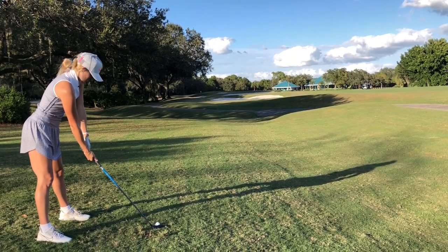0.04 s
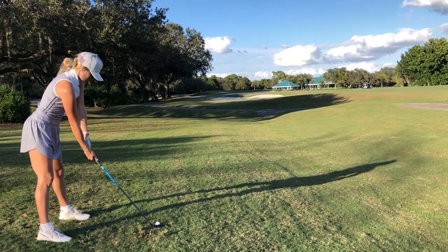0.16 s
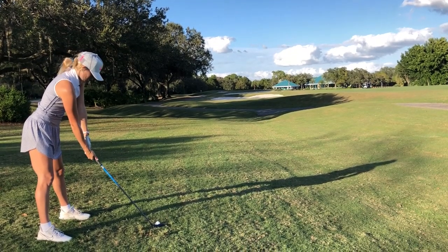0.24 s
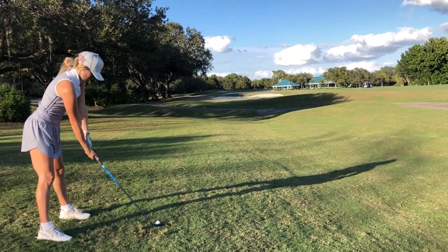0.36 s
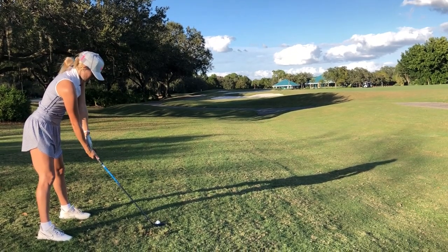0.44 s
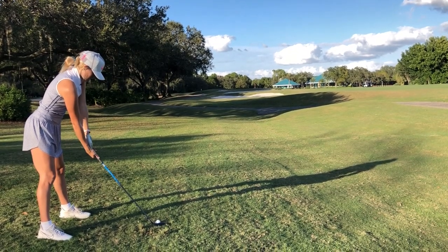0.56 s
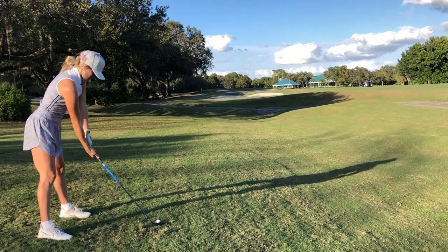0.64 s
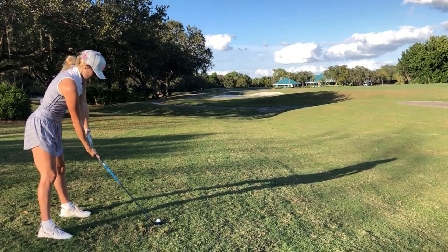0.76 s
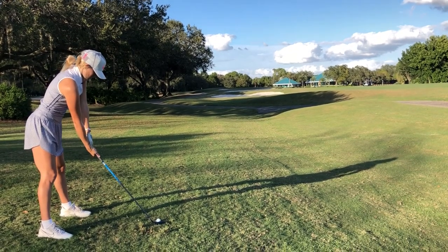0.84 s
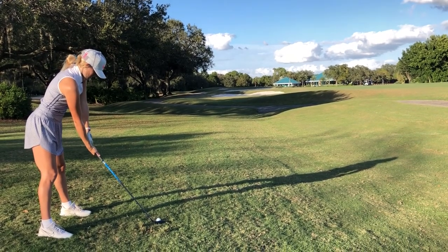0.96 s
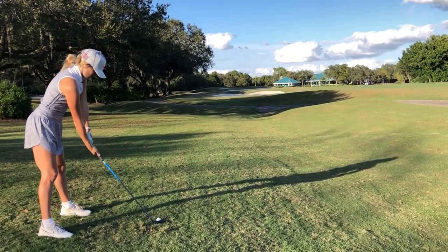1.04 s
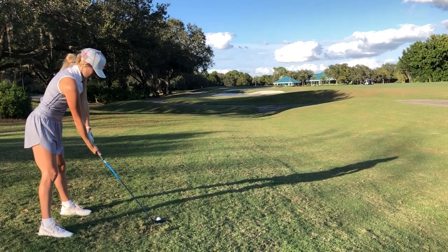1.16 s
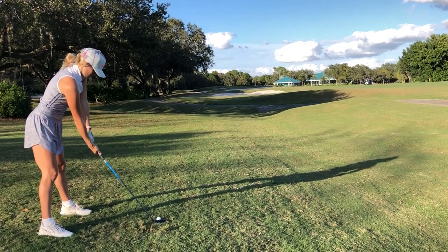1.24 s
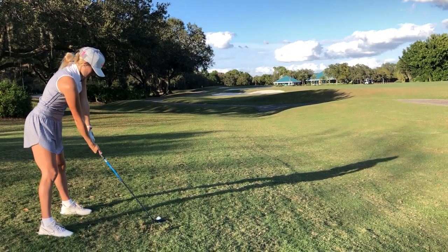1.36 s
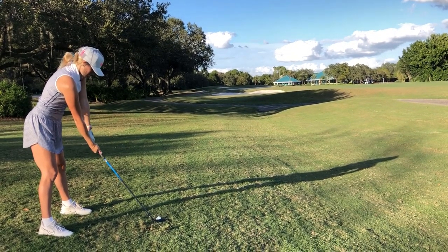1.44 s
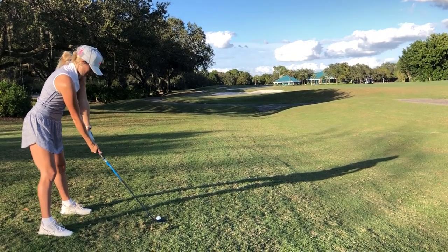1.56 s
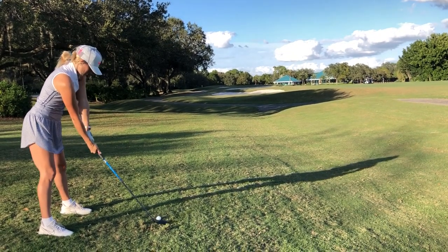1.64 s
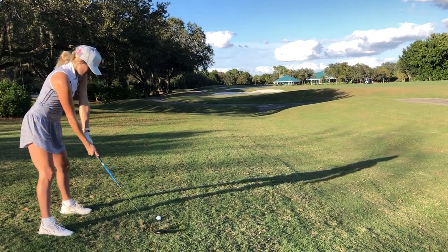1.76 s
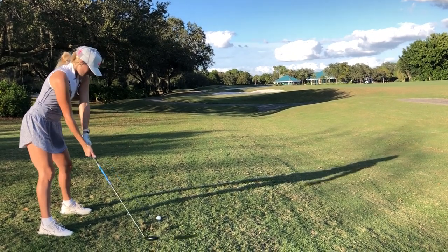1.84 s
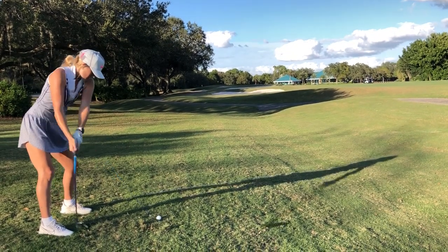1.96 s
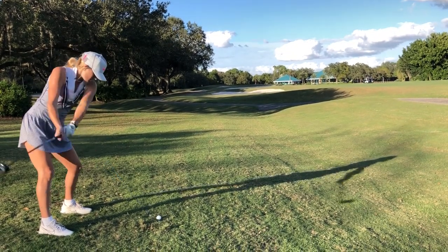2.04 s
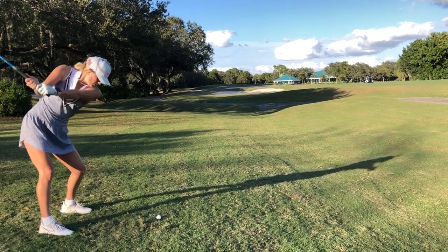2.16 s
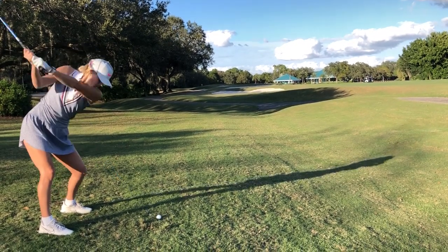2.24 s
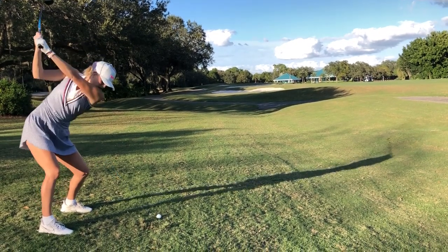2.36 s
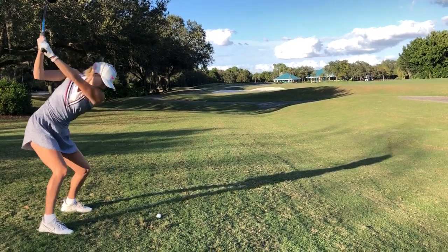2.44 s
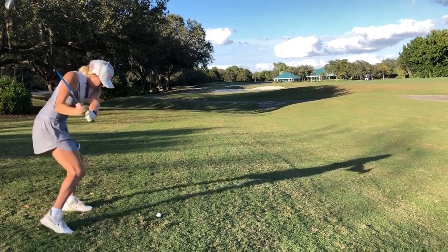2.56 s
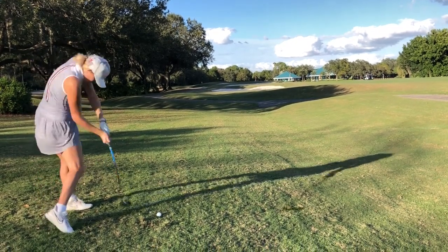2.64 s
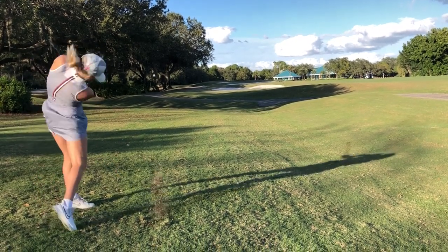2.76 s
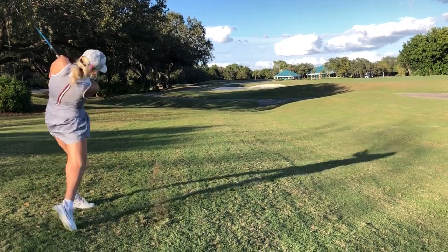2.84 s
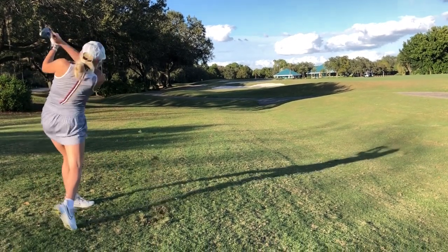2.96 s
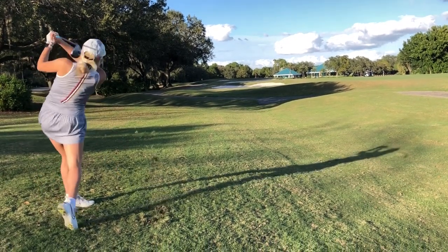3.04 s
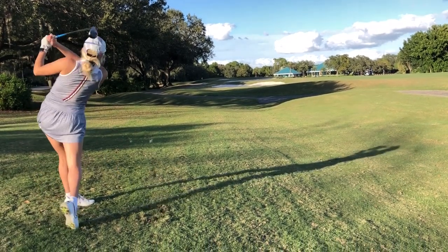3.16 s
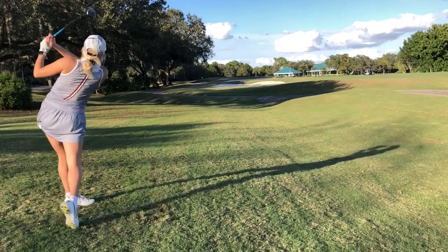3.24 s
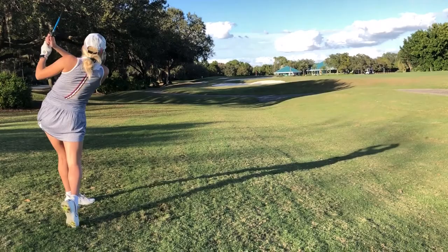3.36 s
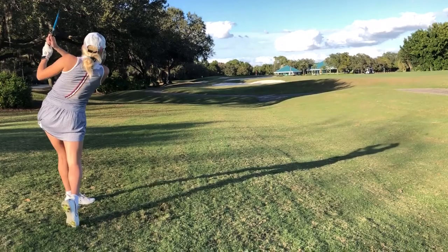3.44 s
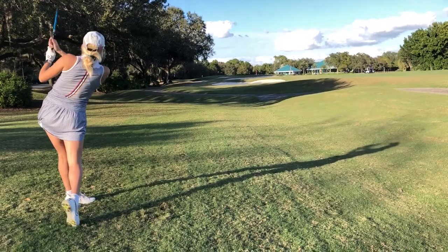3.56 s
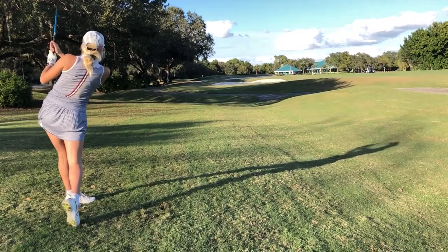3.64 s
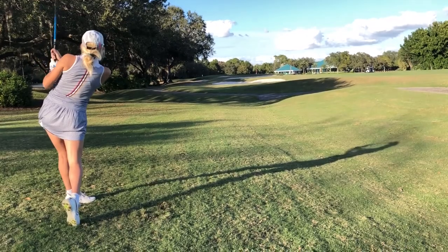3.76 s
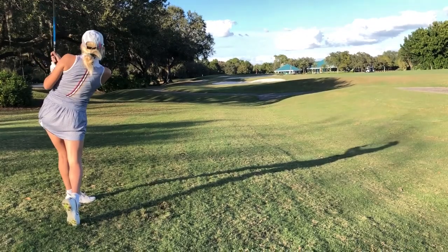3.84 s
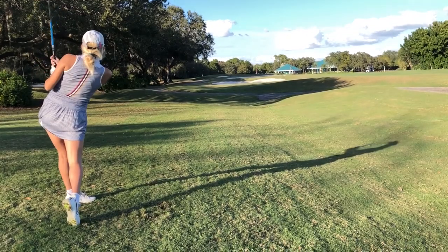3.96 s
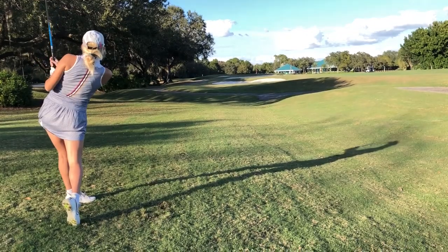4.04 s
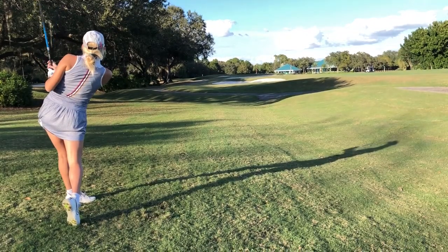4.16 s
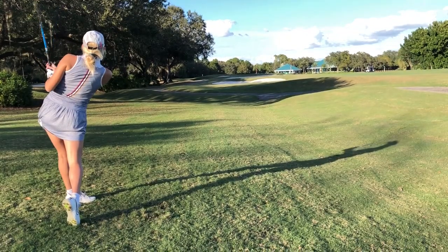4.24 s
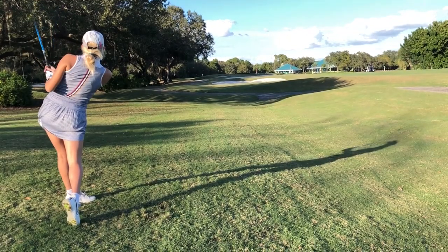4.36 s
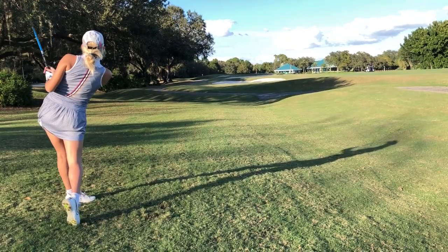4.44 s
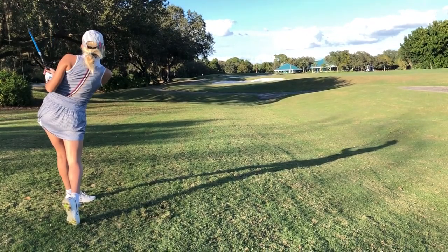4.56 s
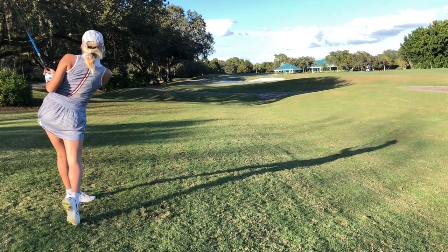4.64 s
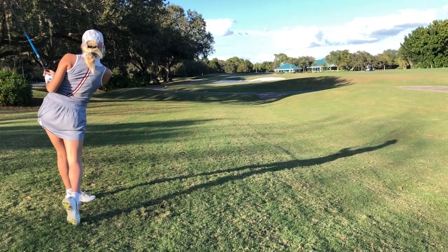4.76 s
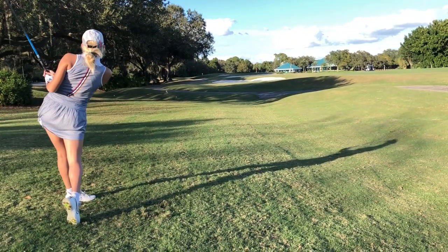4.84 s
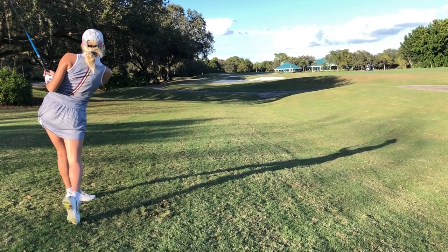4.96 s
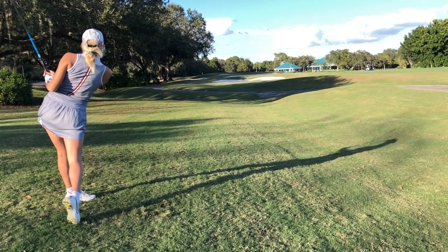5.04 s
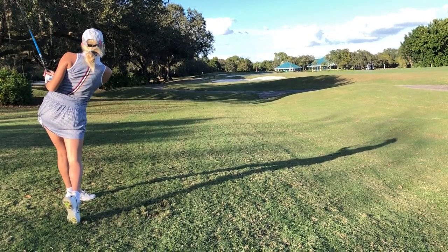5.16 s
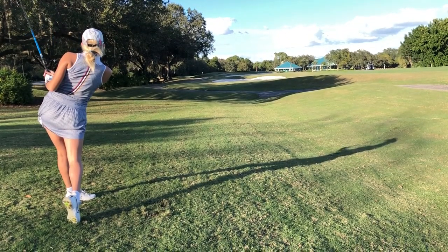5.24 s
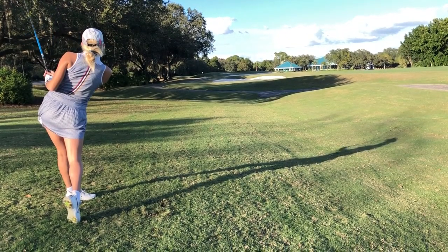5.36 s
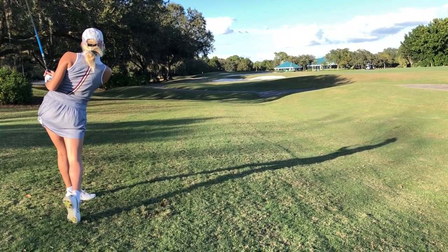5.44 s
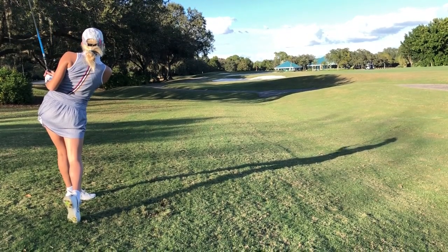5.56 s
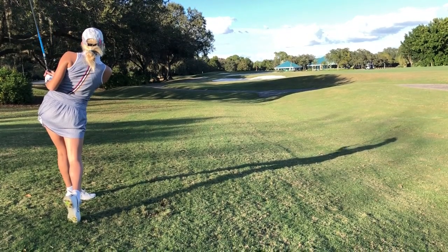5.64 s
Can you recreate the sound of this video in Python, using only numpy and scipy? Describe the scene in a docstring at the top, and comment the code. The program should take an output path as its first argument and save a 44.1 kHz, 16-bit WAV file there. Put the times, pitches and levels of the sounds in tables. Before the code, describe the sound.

A faint, steady outdoor background runs throughout: distant traffic rumble, a soft wash of air and tiny high peeps from far birds. One nearer bird chips at about 0.9 seconds. Around 1.6 seconds a golf club barely brushes the grass, and at 2.4 a thin, falling bird call sounds. The iron swishes down at 2.6 and, at 2.7, rips the turf and strikes the ball with a sharp, bright click and a dull thud. This is the loudest moment, briefly overloading the microphone, and the tree line echoes it. Just after 3.1 seconds comes a quick cluster of sharp woody cracks, as of the ball hitting branches, scattering through the trees. Small bits tick down, fading until about 4.1. Soft leafy rustles with light knocks follow around 4.5 to 4.7, then only the birds and rumble remain until about 5.6 seconds.

```python
"""A golf iron swishes down, cuts the turf and strikes the ball; the tree line throws the click back.
Moments later come sharp woody cracks, as of the ball hitting branches, then soft falls through leaves.
Small birds call over a distant rumble and still air; the loudest blow overloads the microphone."""
import sys
import numpy as np
from scipy import signal
from scipy.fft import rfft, irfft, next_fast_len
from scipy.io import wavfile
from scipy.ndimage import map_coordinates

SR = 44100
rng = np.random.default_rng(int(sys.argv[2]) if len(sys.argv) > 2 else 0)


def int16_out(signal):
    """Quantize to a 16-bit WAV file."""
    q = np.round(np.clip(np.atleast_2d(signal).T, -1, 1) * 32767)
    wavfile.write(sys.argv[1], SR, q.astype(np.int16))


N = 251805

# the iron's head and the ball ring together: (Hz, dB, t60 s)
IRON = [(1060, -20, .03), (1545, -21, .025), (4150, -19, .03), (4605, -14, .042), (5870, 10, .0065), (6330, -14, .035),
        (7130, -13, .025), (8050, -14, .03), (10100, -7, .014), (13400, -17, .018), (15260, -19, .02),
        (8350, -16.5, .065)]  # fixed
STRIKE_S = 2.7203
# the sole tears through grass and soil: (s, blades dB, soil dB, rise s, t60 s)
DIVOT = [(2.696, -34, -61, 0.00034, 0.025), (2.7103, -29, -28.5, .0005, 0.017), (2.7134, -8, -19.5, 0.00082, .03),
         (2.716, -12.5, -12, .001, 0.026), (2.7318, -20, -25.5, .001, 0.062)]
BLADES = [(1500, -10), (2900, -16.5), (4200, -10), (5000, -8), (6000, -0.5), (6900, -6.5), (8300, 1), (9100, -9), (11500, -8), (12600, -7.5), (14000, -12), (16000, -11.5)]  # (Hz, dB per Hz)
SOIL = [(60, -9.5), (200, -3), (290, 0), (420, -1), (640, -0.5), (850, -16.5), (1100, -6), (1600, -9.5), (2500, -18), (5000, -49)]  # (Hz, dB per Hz)
# a struck branch: (Hz, dB, t60 s)
WOOD = [(1408, -23, .035), (2219, -16.5, 0.013), (2750, -12, 0.017), (3373, -2.5, 0.019), (4020, -14.5, 0.04), (4300, -8.5, .014), (4960, -8.5, 0.013), (7640, -18.5, .018), (8374, -20, 0.027), (11730, -23.5, 0.0199)]
# blows on twigs and branches, thinner ones ringing higher: (s, ring dB, pitch ratio, snap dB, snap t60 s)
KNOCKS = [(3.1054, -46, 1.3, -21, .009), (3.1328, -18, 1.0, -30, 0.12), (3.1465, -3.5, 1.0, -18, .024), (3.19, -35, 1.15, -31, .015), (3.2127, -22.5, 1.02, -31, 0.027),
          (3.928, -46, 1.1, -54, .03), (4.5168, -30, 1.1, -46.5, .02), (4.571, -44, 1.12, -59, .02), (4.6452, -39, 1.55, -49, .02)]
SNAP = [(300, -3.5), (1200, 0), (2500, -2), (5000, -3), (8000, -3), (9500, -6.5), (12000, 0), (16000, -6)]  # (Hz, dB per Hz)
# brief stirs of leaves and grass: (s, dB, rise s, t60 s, brightness dB per octave)
RUSTLES = [(1.906, -53.5, .002, .05, 4.5), (2.396, -53, 0.0022, 0.04, 4), (3.942, -51.5, 0.0014, .06, 4), (4.501, -38, .001, 0.24, -1),
           (4.644, -46, 0.0011, 0.15, 1.5), (5.04, -55, .004, 0.079, 8)]
LEAVES = [(400, -14), (750, -5), (1200, -13), (1620, -4.5), (2100, -11.5), (2900, -9.5), (3750, 0), (4500, -5.5), (6200, -11), (10000, -20), (12300, -23), (15800, -39.5)]  # (Hz, dB per Hz)
# the club's click as the near edge of the trees sends it back: (Hz, dB per Hz)
CLICK_NEAR = [(710, -46), (1200, -8), (1400, -6), (1710, -14), (1890, -13), (2030, -18), (2970, -3), (3340, -15.5),
              (3970, -11.5), (5030, -1.5), (5660, -11), (6520, 2), (8810, -18), (10900, -11), (15800, -24)]
# the click from deep inside the trees: (Hz, dB per Hz)
CLICK_FAR = [(1500, -10), (2700, -7.5), (3500, -10), (4400, -7.5), (5050, 1), (5650, -7.5), (6350, 0.5), (7200, -13.5), (9000, -20), (16000, -24)]
# a branch's crack as its own crown scatters it: (Hz, dB per Hz)
CRACK_NEAR = [(350, -30.5), (600, -5.5), (800, -13.5), (955, -6.5), (1110, -15.5), (1400, -4), (1540, -17), (2320, -15.5),
              (3960, -4), (4670, -7.5), (6220, -8), (6750, -11), (15800, -17.5)]
# the crack from deep inside the grove: (Hz, dB per Hz)
CRACK_FAR = [(1500, -18), (3000, -12), (3600, -3), (4050, 0.5), (4700, -9.5), (6000, -14.5), (8500, -22.5), (12000, -19), (16000, -32)]
# the clearest paired peeps of small far birds: (s, Hz, dB)
PEEPS = [(.215, 6000, -67), (.575, 5970, -70), (2.06, 5560, -68), (3.9, 5620, -69), (4.35, 5640, -67.5), (4.835, 5900, -67), (5.22, 5950, -68), (5.352, 5620, -67.5), (5.597, 5970, -66.5)]
AIR = [(150, -32.5), (250, -4.5), (360, -1), (450, -3), (720, -2), (950, -2), (1250, -7), (1650, -15), (2250, -19.5), (4400, -26.5), (5700, -26.5), (7600, -31), (10000, -33), (15800, -34.5)]  # (Hz, dB per Hz)
RUMBLE = [(12, -52.5), (20, -30.5), (59, -1.5), (123, 1.5), (150, 0.5), (300, -17), (390, -47), (660, -120)]  # (Hz, dB per Hz)
# echo delay of the second row of trees (s)
BEHIND_S = .115  # fixed
TOP_HZ = 15900  # fixed
T = np.arange(N) / SR
# a thin steady whine, perhaps of insects in the grass: (Hz, unsteadiness, dB)
SHRILL = [(8950, .008, -80), (9990, .001, -79)]
# the ground under the divot: (Hz, dB, t60 s)
GROUND = [(52.04, -7.5, 0.14), (130, -8, 0.055), (185, 0.5, 0.065), (277, -6, 0.025)]
# the club skims the grass on the way back: start, attack, hold, release (s) and level (dB)
SKIM_S, SKIM_ATTACK_S, SKIM_HOLD_S, SKIM_RELEASE_S, SKIM_DB = 1.54, 0.14, .1, .07, -59.5
# the downswing: clothes start to swish, then the wrists let go and whip the club up to speed (s)
DOWNSWING_S, WHIP_S, WHIP_RISE_S = 2.41, 2.628, .016
# the blow takes a share of the club's speed within BRAKE_S; the rest fades over COAST_S
SPEED_LOSS, BRAKE_S, COAST_S = .36, .012, .27
# air noise at full speed, and the swish of clothes (dB)
SHAFT_DB, HEAD_DB, HISS_DB, CLOTHES_DB = -32.5, -39, -40, -60.5
# the hiss swells as the head nears the ball and fades as it leaves
HISS_RISE_DB_PER_S, HISS_FALL_DB_PER_S = 250, 330
# a fainter bird peeps at random, about once in each interval
FAINT_PEEP_EVERY_S, FAINT_PEEP_HZ, FAINT_PEEP_DB = .45, 5450, -70.5
# a nearer bird's chip, one quick arch of pitch: time and half width (s), top pitch (Hz), level (dB)
CHIP_S, CHIP_WIDTH_S, CHIP_HZ, CHIP_DB = .8635, 0.0048, 5480, -45
# a thin falling call: start, attack, hold and release (s); its pitch settles over CALL_SETTLE_S
CALL_S, CALL_ATTACK_S, CALL_HOLD_S, CALL_RELEASE_S, CALL_SETTLE_S = 2.42, .025, .19, .06, 0.046
# the call's two voices: (final Hz, share sharp at the start, fade dB per s, dB of harmonics 1 to 4)
CALL_VOICES = [(2765, .16, 5, -66, -60, -80, -75), (2240, .04, 55, -80.5, -63, -64.5, -78)]
# distant traffic and the wash of air: level and slow drift (dB)
RUMBLE_DB, RUMBLE_DRIFT_DB, AIR_DB, AIR_DRIFT_DB = -44.5, 0.8, -51, 0.52
# the dull thwack of the head driving into the turf: (Hz, dB, t60 s)
THWACK = [(320, -17, .03), (668, -14, .018), (1230, -14, .02), (1690, -20, .018)]
THWACK_S = 2.7178
# bits of twig and leaf tick down after the cracks: start (s), rate (per s), first level (dB), fade (dB per s)
DEBRIS_S, DEBRIS_PER_S, DEBRIS_DB, DEBRIS_FADE_DB_PER_S = 3.22, 22, -47.5, 14


def amp(db):
    """Decibels to gain."""
    return 10 ** (np.asarray(db) / 20)


def unit(x):
    """Scale to rms 1."""
    return x / np.sqrt(np.mean(x ** 2) + 1e-20)


def noise(spectrum, tilt_db=0, size=2 * SR):
    """Noise of rms 1 shaped by (Hz, dB) points and a tilt per octave; size samples, repeated, serve a short sound."""
    octave = np.log2(np.fft.rfftfreq(size, 1 / SR) + 1)
    hz, db = np.transpose(spectrum)
    gain = amp(np.interp(octave, np.log2(hz), db, left=-120) + tilt_db * octave)
    return np.resize(unit(irfft(rfft(rng.standard_normal(size)) * gain, size)), N)


def swell(start, attack, hold, release):
    """An envelope that rises smoothly at start, holds and falls to silence."""
    ramp = np.minimum((T - start) / attack, 1 - (T - start - attack - hold) / release)
    return np.sin(np.pi / 2 * np.clip(ramp, 0, 1)) ** 2


def burst(start, rise, t60):
    """An envelope that rises at start and dies away."""
    age = np.arange(round(2 * t60 * SR)) / SR
    return np.pad((1 - np.exp(-age / rise)) * amp(-60 * age / t60), (round(start * SR), N))[:N]


def ring(modes, start, rise):
    """Damped modes set off by one blow."""
    age = np.arange(SR // 4) / SR
    tone = sum((-1) ** k * amp(db - 60 * age / t60) * np.sin(2 * np.pi * hz * age) for k, (hz, db, t60) in enumerate(modes))
    return np.pad(tone * (1 - np.exp(-age / rise)), (round(start * SR), N))[:N]


def scatter(x, spectrum, delay, rise, t60):
    """Countless leaves and trunks smear the energy of x into a diffuse echo."""
    spread = burst(delay, rise, t60)[:2 * SR] ** 2
    power = signal.fftconvolve(x ** 2, spread / spread.sum())[:N]
    return np.sqrt(np.abs(power)) * noise(spectrum)




def swing():
    """Shaft and head shed eddies, louder and higher with speed; the hiss peaks as the head passes the ball."""
    speed = club_speed()
    eddies = noise([(150, -18), (330, -1), (480, 3), (700, -2), (1000, -13), (1500, -22), (4000, -39)])
    shaft = speed ** 3 * map_coordinates(eddies, [np.cumsum(speed ** .5)], mode="wrap")  # fixed
    head = speed ** 4.2 * noise([(600, -6.5), (1200, 3.5), (2200, -11.0), (4000, -13.5), (8000, -25.5)])
    hiss = amp(HISS_DB + np.minimum(HISS_RISE_DB_PER_S * (T - STRIKE_S), HISS_FALL_DB_PER_S * (STRIKE_S - T)))
    clothes = amp(CLOTHES_DB) * swell(DOWNSWING_S, attack=.05, hold=.3, release=.08)
    spray = noise([(2000, -6.5), (4000, 0), (7500, 2), (10000, -6.5), (16000, -8.5)])
    return amp(SHAFT_DB) * shaft + amp(HEAD_DB) * head + np.hypot(hiss, clothes) * spray


def strike():
    """The sole rips the turf, the face cracks on the ball and the ground thuds."""
    blades = sum(amp(db) * burst(s, rise, t60) for s, db, _, rise, t60 in DIVOT) * noise(BLADES)
    soil = sum(amp(db) * burst(s, rise, t60) for s, _, db, rise, t60 in DIVOT) * noise(SOIL)
    click = amp(-1.5) * ring(IRON, STRIKE_S, rise=0.00022)
    crack = amp(-6.0) * burst(STRIKE_S, .0001, .016) * noise([(1500, -5), (5500, -1.5), (10500, -1.5), (16000, -7)])
    thud = amp(-18.5) * ring(GROUND, 2.7275, rise=0.003)
    return blades + soil + click + crack + thud + ring(THWACK, THWACK_S, rise=0.00068)


def strike_echo(hit):
    """The tree line answers twice from its edge, then lingers."""
    edge = amp(-20.5) * scatter(hit, CLICK_NEAR, delay=.077, rise=.002, t60=0.24)
    behind = amp(-24.5) * scatter(hit, CLICK_FAR, delay=BEHIND_S, rise=.003, t60=0.11)
    deep = amp(-30) * scatter(hit, CLICK_FAR, delay=.15, rise=.05, t60=1.1)
    return edge + behind + deep


def branches():
    """Each blow snaps and rings the wood; the crown and the grove scatter it."""
    wood = sum(amp(db) * ring([(hz * pitch, level, t60) for hz, level, t60 in WOOD if hz * pitch < TOP_HZ], s, rise=.0001)
               for s, db, pitch, _, _ in KNOCKS)
    snaps = sum(amp(db) * burst(s, .0001, t60) for s, _, _, db, t60 in KNOCKS) * noise(SNAP)
    crack = wood + snaps
    crown = amp(-10.5) * scatter(crack, CRACK_NEAR, delay=0.00303, rise=0.0025, t60=0.36)
    grove = amp(-23.5) * scatter(crack, CRACK_FAR, delay=.07, rise=0.05, t60=0.98)
    far_edge = amp(-27.5) * scatter(crack, CRACK_FAR, delay=.187, rise=.005, t60=.4)
    # single trunks and twigs make the tail grainy
    grain = unit(amp(2.2 * wobble(220)))  # fixed
    return crack + grain * (crown + grove + far_edge)


def rustles():
    """Leaves and grass give way in short, soft bursts that linger in the grove."""
    stirs = sum(amp(db) * burst(s, rise, t60) * noise(LEAVES, tilt) for s, db, rise, t60, tilt in RUSTLES)
    return stirs + amp(-15.5) * scatter(stirs, CRACK_FAR, delay=0.034, rise=.02, t60=0.31)


def birds():
    """Faint peeps and one arched chip echo in the trees; a thin call falls away."""
    notes = peeps() + chip()
    echo = amp(-12) * scatter(notes, [(3500, -25), (5300, 2), (5900, -3), (6300, -25), (9000, -60)], delay=.005, rise=.003, t60=0.22)
    return notes + echo + call()


def background():
    """Distant traffic rumble under a steady wash of air, both drifting slowly, with a faint whine."""
    size = next_fast_len(N, real=True)
    rumble = amp(RUMBLE_DB + RUMBLE_DRIFT_DB * wobble(2.5)) * noise(RUMBLE, size=size)
    air = amp(AIR_DB + AIR_DRIFT_DB * wobble(0.95)) * noise(AIR, size=size)
    whine = sum(amp(db) * np.sin(2 * np.pi * np.cumsum(hz * (1 + waver * wobble(400))) / SR) for hz, waver, db in SHRILL)
    return rumble + air + whine


def wobble(rate, size=N):
    """A smooth random curve, rate knots a second."""
    return map_coordinates(rng.standard_normal(int(size * rate / SR) + 4), [T[:size] * rate])


def peeps(note_s=0.05, gap_s=0.054):
    """Far birds' paired notes, each a soft arch blurred by distance."""
    song = np.zeros(N + SR)
    arch = np.hanning(round(note_s * SR))
    blur = .011 * wobble(500)  # fixed
    chance = rng.uniform(-1.2, 1, (16, 3))
    faint = [((k + .5 + late / 2) * FAINT_PEEP_EVERY_S, FAINT_PEEP_HZ * (1 + .015 * sharp), FAINT_PEEP_DB + 2 * loud)
             for k, (late, sharp, loud) in enumerate(chance)]
    for s, hz, db in [row for row in PEEPS + faint if row[0] < T[-1]]:
        for start in (round(s * SR), round((s + gap_s) * SR)):
            pitch = hz * (1 + 0.011 * (arch - 1) + np.take(blur, start + np.arange(len(arch)), mode="wrap"))
            song[start:start + len(arch)] += amp(db) * arch * np.sin(2 * np.pi * np.cumsum(pitch) / SR)
    return song[:N]


def takeaway():
    """The head brushes the grass as it is drawn back."""
    skim = swell(SKIM_S, SKIM_ATTACK_S, SKIM_HOLD_S, SKIM_RELEASE_S)
    return amp(SKIM_DB) * skim * noise([(2500, -12), (7000, 0), (10000, 0.5), (14000, 0), (15500, 2.5)])


def club_speed():
    """Share of full speed: whipped up, braked by the blow, then coasting out."""
    after = np.maximum(T - STRIKE_S, 0)
    whip = (1 + np.tanh((T - WHIP_S) / (2 * WHIP_RISE_S))) / 2
    return whip * (1 - SPEED_LOSS * (1 - np.exp(-after / BRAKE_S))) * np.exp(-after / COAST_S)


def chip(bend=0.12):
    """One short note whose pitch and level rise and fall together."""
    arch = np.exp(-((T - CHIP_S) / CHIP_WIDTH_S) ** 2)
    return amp(CHIP_DB) * arch ** .7 * np.sin(2 * np.pi * np.cumsum(CHIP_HZ * arch ** bend) / SR)


def call(slur=.16, slur_s=.009):
    """Both sides of a bird's syrinx slur up, overshoot and sink to their own pitch."""
    age = np.arange(SR // 2) / SR
    voices = np.zeros(len(age))
    for hz, sharp, fade, *harmonics in CALL_VOICES:
        waver = .004 * wobble(300, len(age))  # fixed
        bend = sharp * np.exp(-age / CALL_SETTLE_S) - slur * np.exp(-age / slur_s)
        phase = 2 * np.pi * np.cumsum(hz * (1 + bend + waver)) / SR
        voices += amp(-fade * age) * sum(amp(db) * np.sin(k * phase) for k, db in enumerate(harmonics, 1))
    flutter = amp(2.5 * wobble(60, len(age)))  # fixed
    return np.pad(voices * flutter, (round(CALL_S * SR), N))[:N] * swell(CALL_S, CALL_ATTACK_S, CALL_HOLD_S, CALL_RELEASE_S)


def debris(count=20):
    """Loosened bits tick through the leaves, ever fainter."""
    ticks = np.zeros(N)
    for k, (late, loud) in enumerate(rng.uniform(0, 1, (count, 2))):
        age = (k + late) / DEBRIS_PER_S
        ticks += amp(DEBRIS_DB - DEBRIS_FADE_DB_PER_S * age - 9 * loud) * burst(DEBRIS_S + age, .0001, .012)
    return ticks * noise(SNAP)


def scene():
    """One stroke on the open fairway."""
    hit = strike()
    return (takeaway() + swing() + hit + strike_echo(hit) + branches() + debris() + rustles() + birds() + background())[None]


def record(dry):
    """The microphone clips at full scale and keeps nothing above its band limit."""
    size = next_fast_len(N + SR // 4, real=True)
    keep = np.fft.rfftfreq(size, 1 / SR) < TOP_HZ
    return irfft(rfft(np.clip(dry, -1, 1), size) * keep, size)[:, :N]


dry = scene()
out = record(dry)
int16_out(out)
```